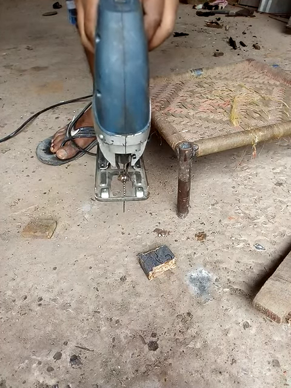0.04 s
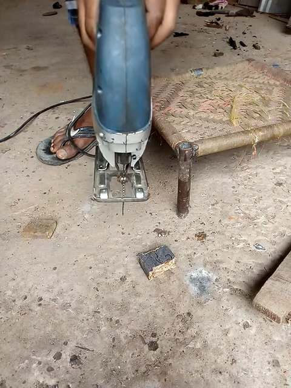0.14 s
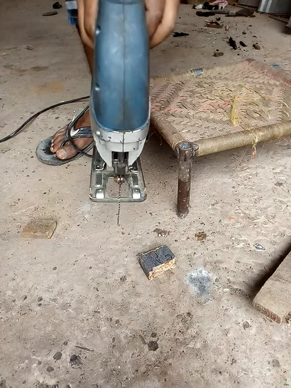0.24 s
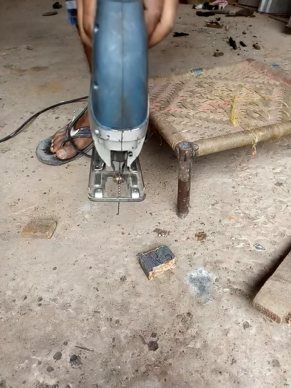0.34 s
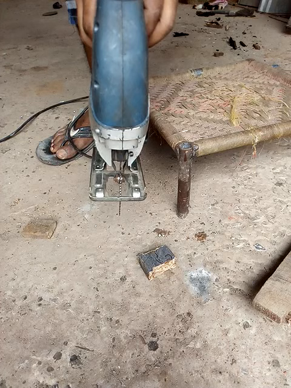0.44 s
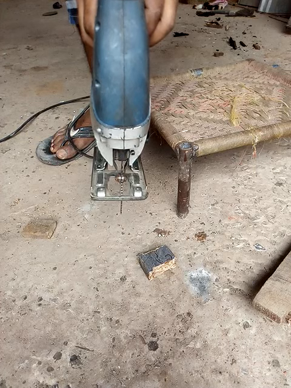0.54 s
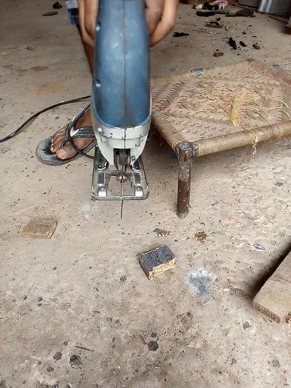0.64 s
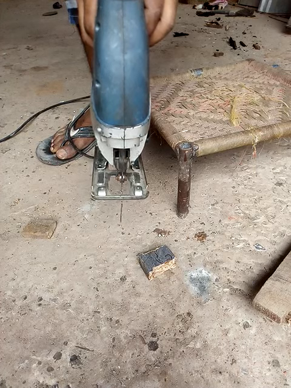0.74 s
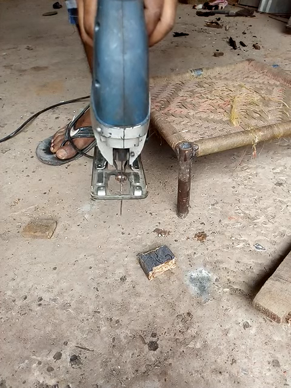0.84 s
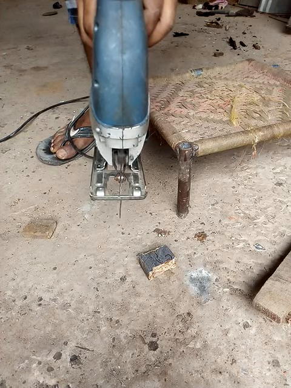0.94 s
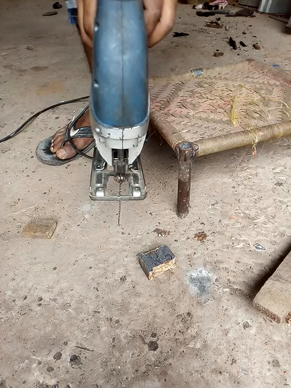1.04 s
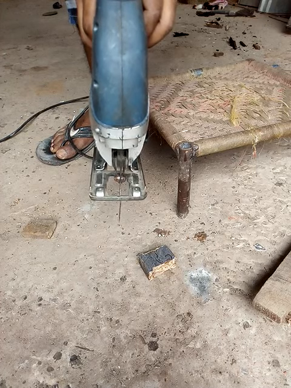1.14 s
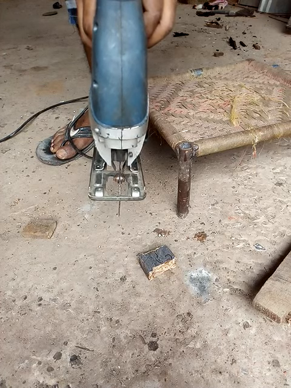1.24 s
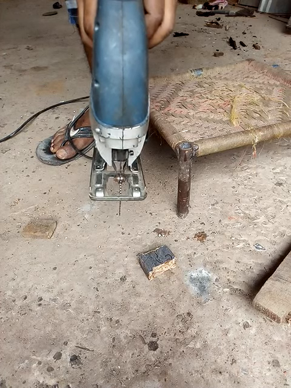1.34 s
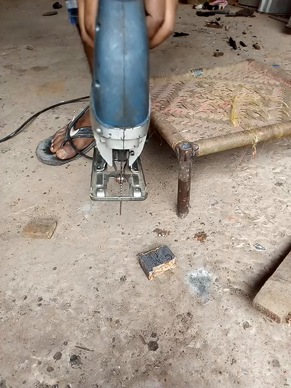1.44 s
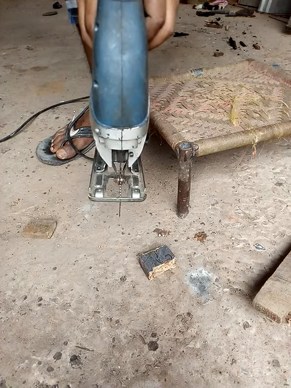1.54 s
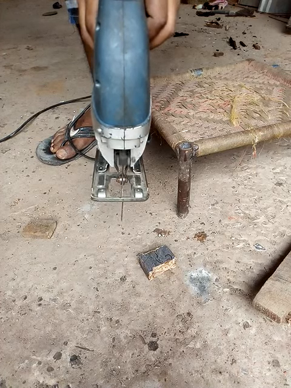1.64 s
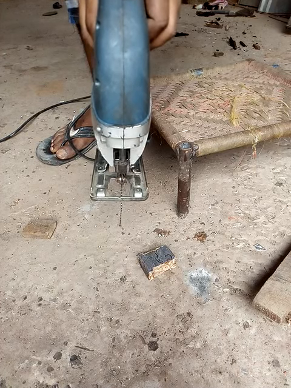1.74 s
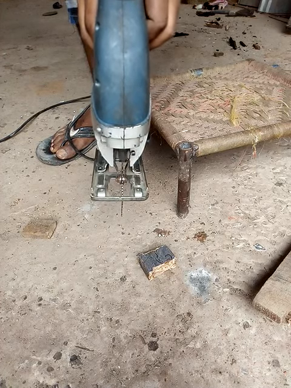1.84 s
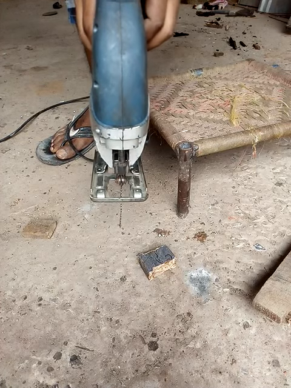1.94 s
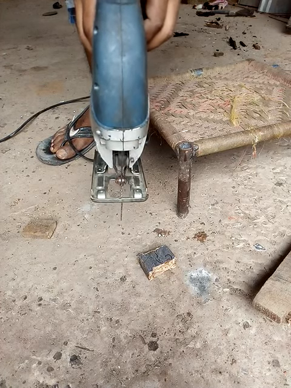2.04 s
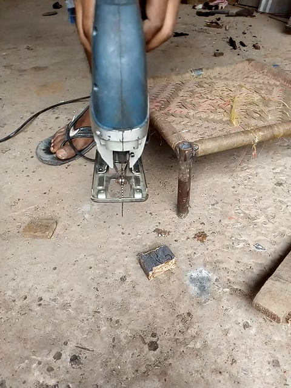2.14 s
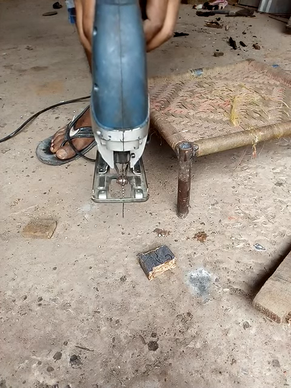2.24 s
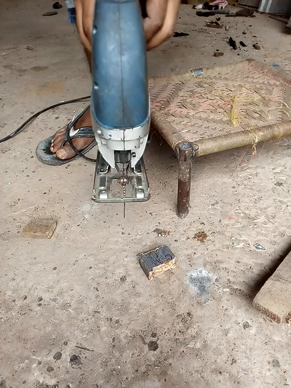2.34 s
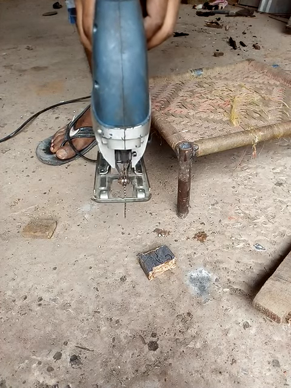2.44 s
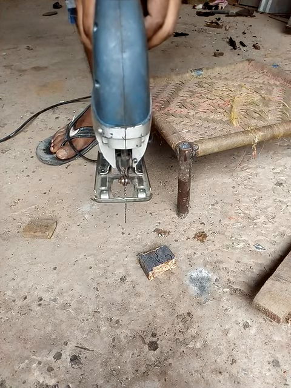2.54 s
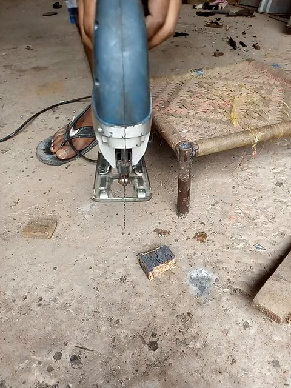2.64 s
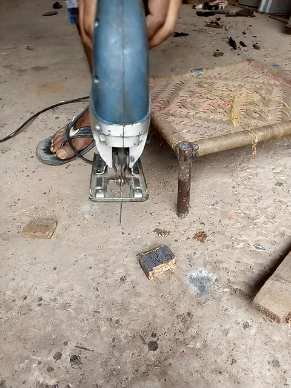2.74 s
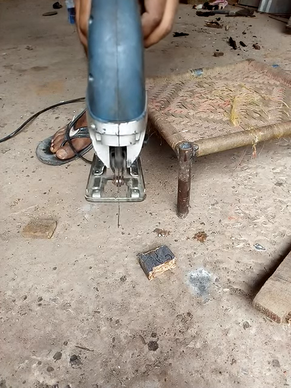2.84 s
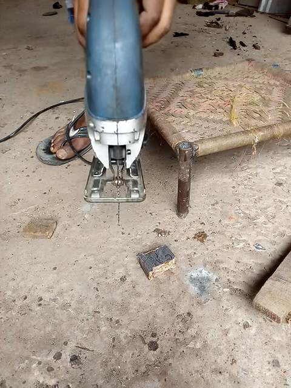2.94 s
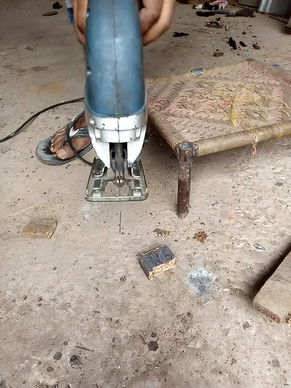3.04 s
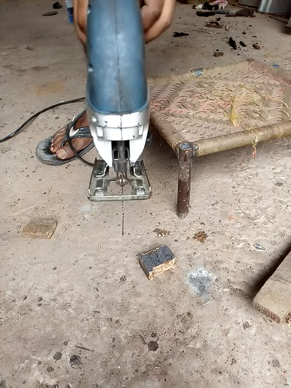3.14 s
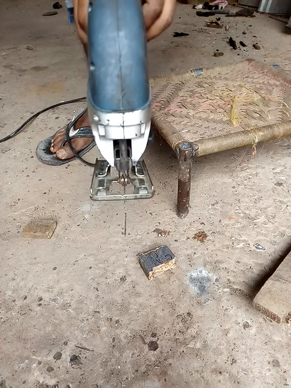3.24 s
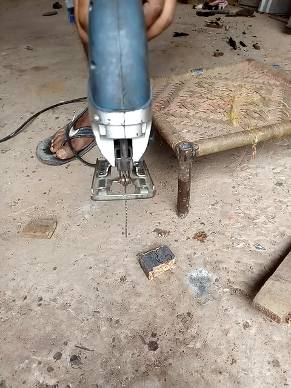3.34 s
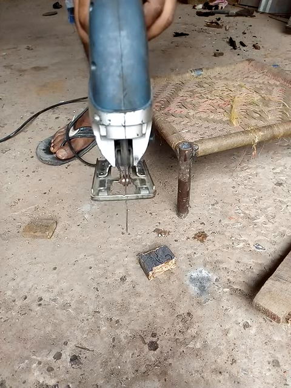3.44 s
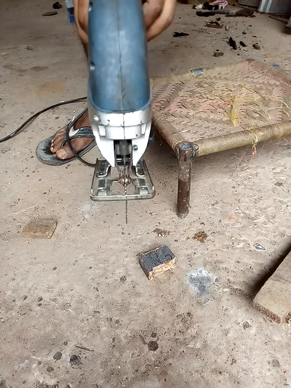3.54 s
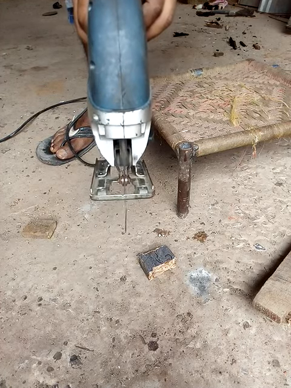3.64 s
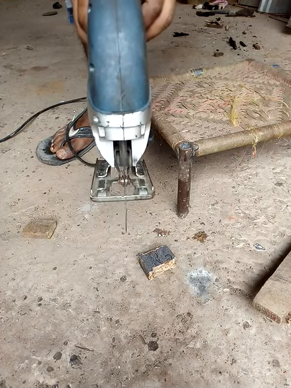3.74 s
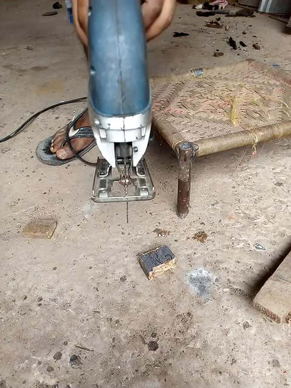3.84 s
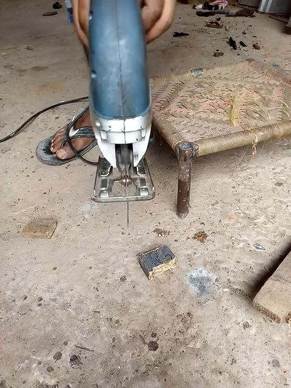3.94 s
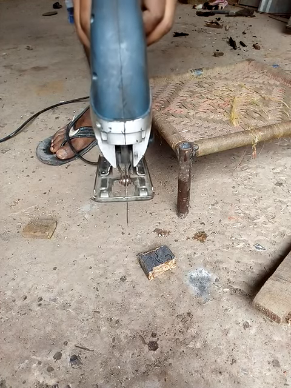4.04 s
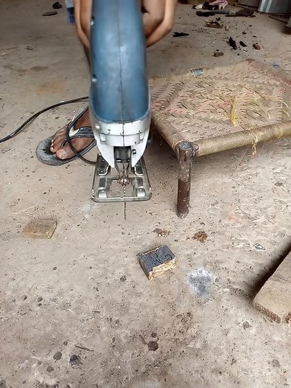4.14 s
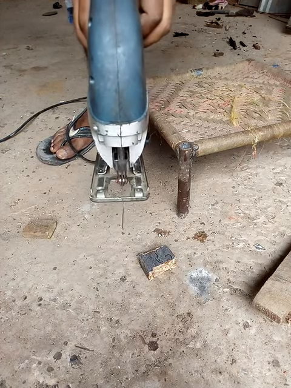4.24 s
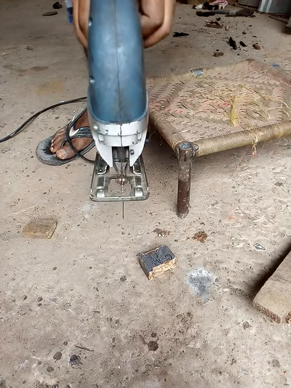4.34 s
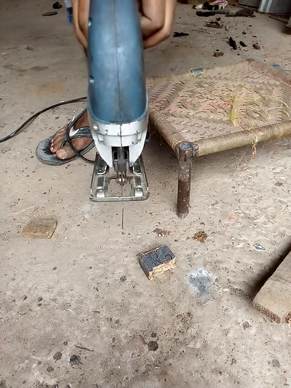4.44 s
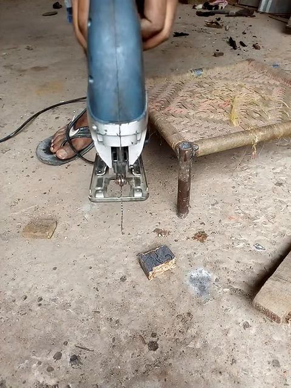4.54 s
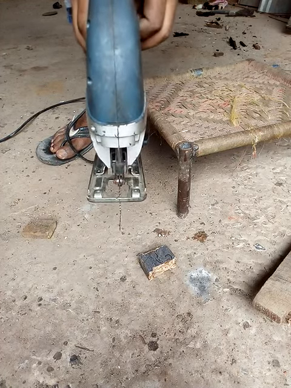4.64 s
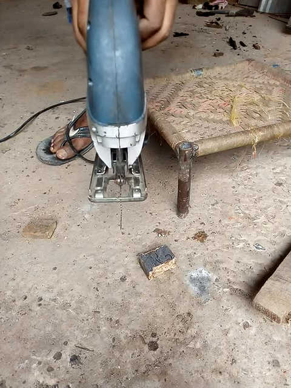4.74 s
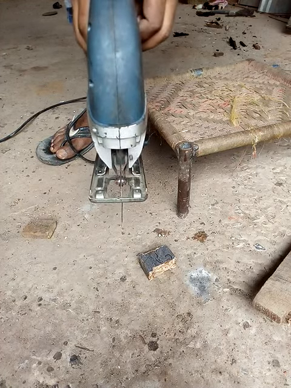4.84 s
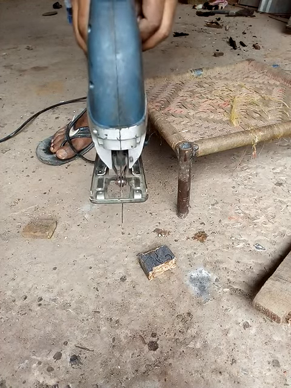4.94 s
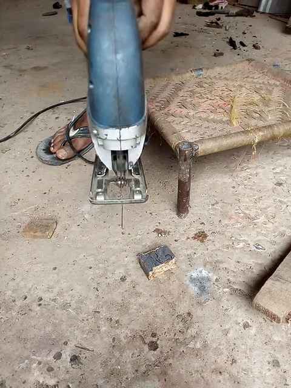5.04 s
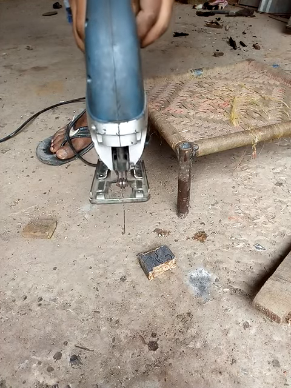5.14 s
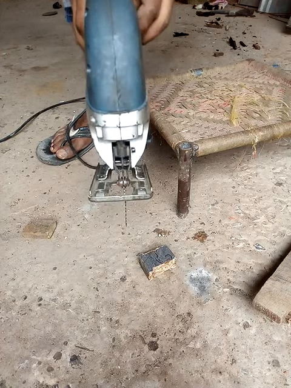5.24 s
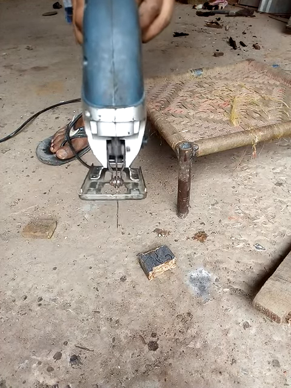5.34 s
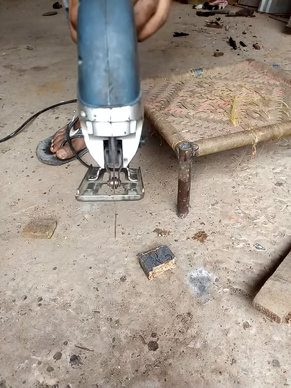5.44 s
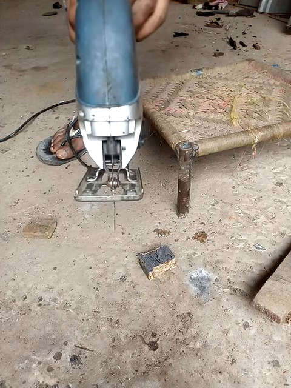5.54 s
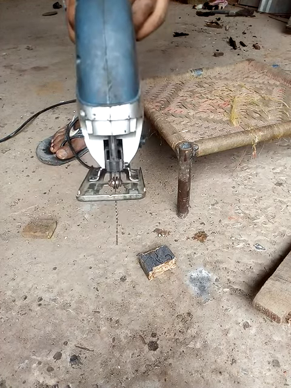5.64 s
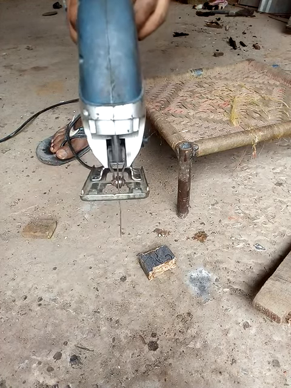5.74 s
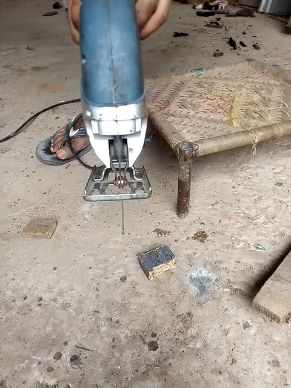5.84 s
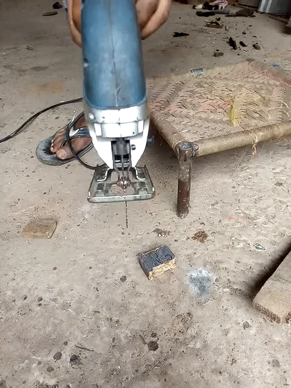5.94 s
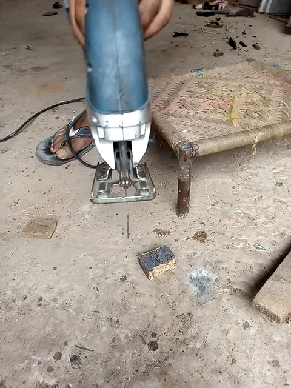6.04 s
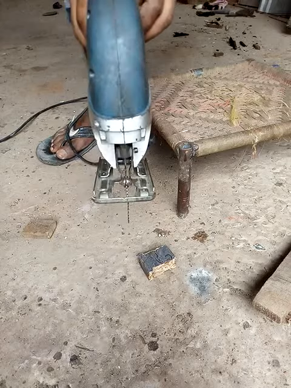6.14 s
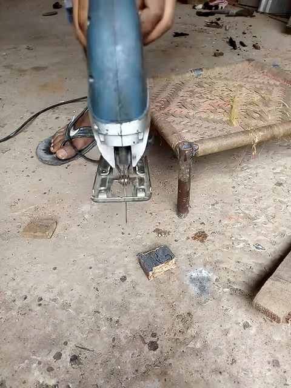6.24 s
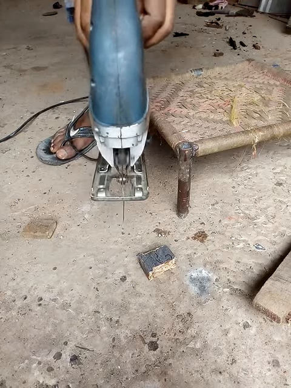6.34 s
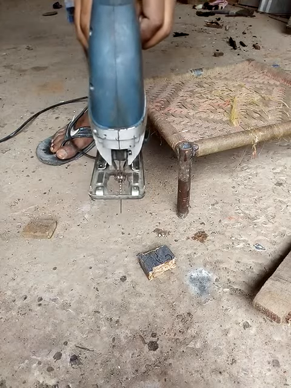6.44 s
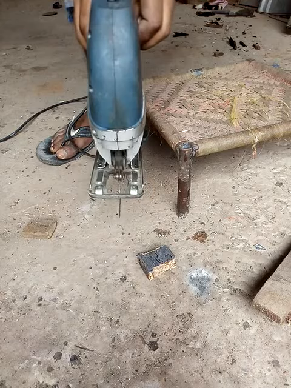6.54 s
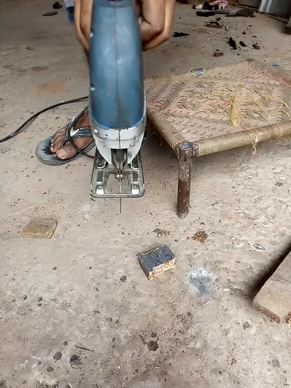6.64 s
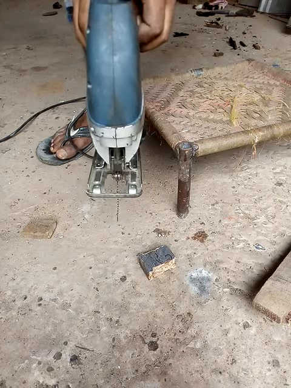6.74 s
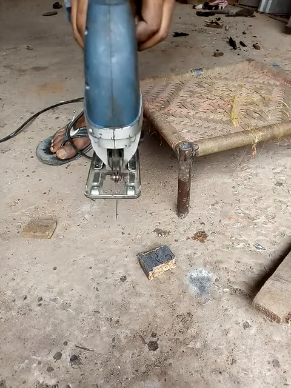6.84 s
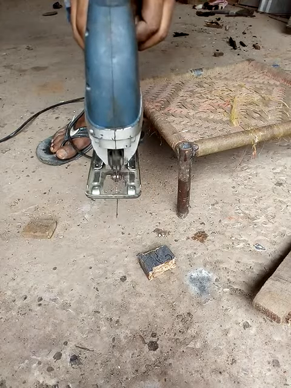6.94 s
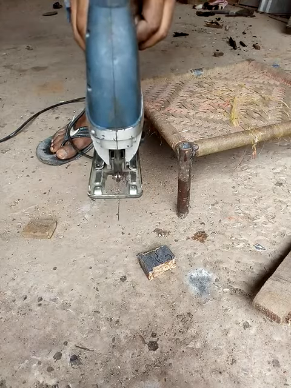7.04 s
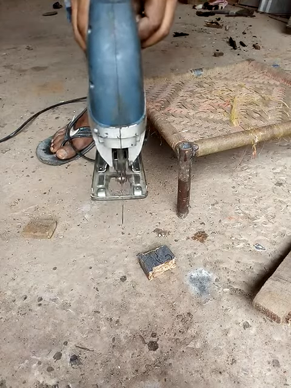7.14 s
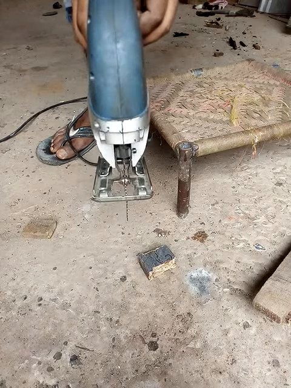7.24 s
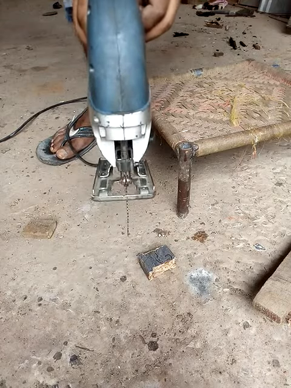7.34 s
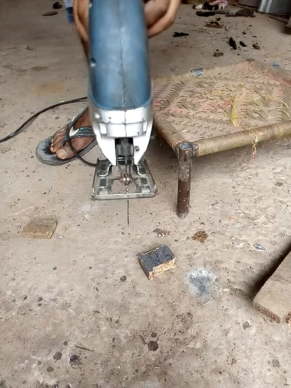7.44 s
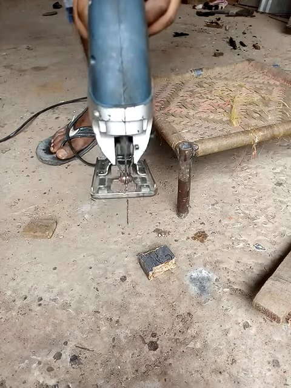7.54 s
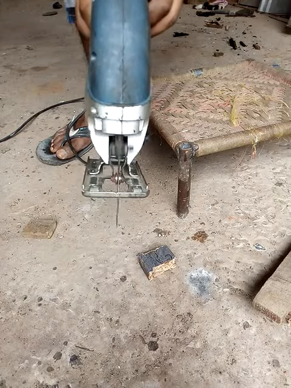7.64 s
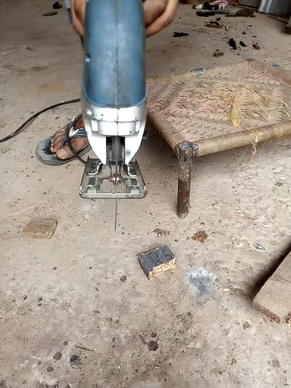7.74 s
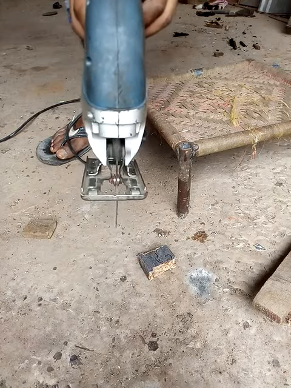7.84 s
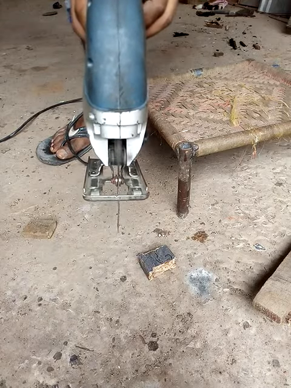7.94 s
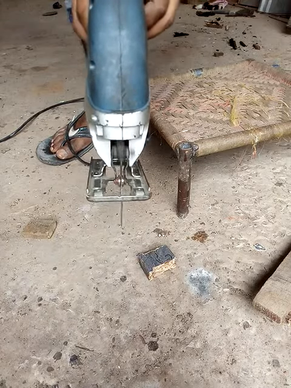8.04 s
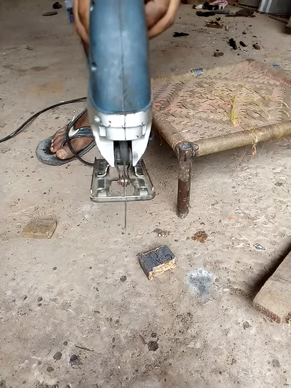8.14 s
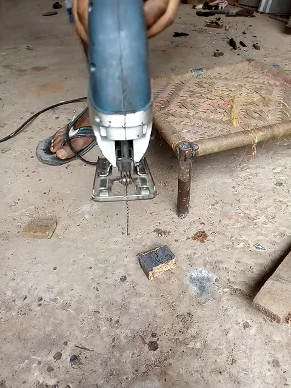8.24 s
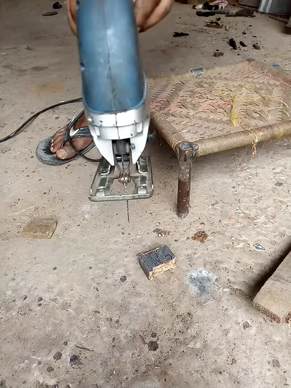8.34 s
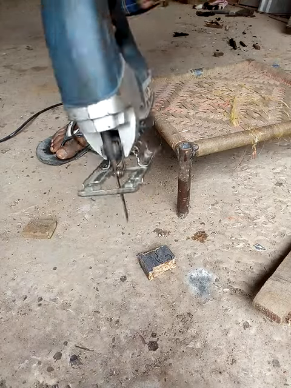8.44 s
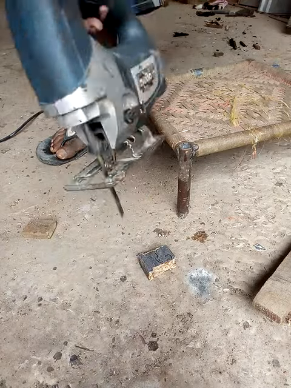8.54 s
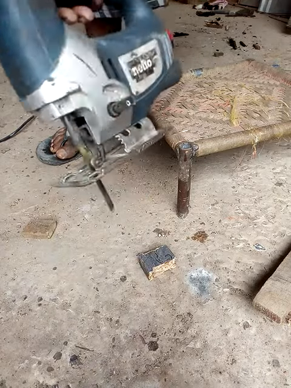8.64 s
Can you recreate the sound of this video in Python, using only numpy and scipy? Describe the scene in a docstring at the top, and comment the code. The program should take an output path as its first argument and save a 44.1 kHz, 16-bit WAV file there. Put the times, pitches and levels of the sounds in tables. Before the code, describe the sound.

Close to the microphone, an electric jigsaw held above a hard floor clicks on and runs in the air. A slow, clattering first run is followed by three faster, louder surges of buzzing motor and gears. After each one the saw winds down and the blade's strokes rattle more slowly, with occasional sharp ticks. At top speed its cooling air hisses and puffs softly against the microphone. The background is quiet.

```python
"""A faint hum and a thin squeal come first, then a trigger clicks and an electric jigsaw revs up.
It runs free above a hard floor, driven by four pulls of the trigger and coasting in between.
The blade rod clacks at both ends of each stroke and the gears grind; both excite the resonances of one
housing. At speed the rotor whines and cooling air hisses from the vents and buffets the microphone."""
import sys
import numpy as np
from scipy import signal
from scipy.fft import rfft, irfft, next_fast_len
from scipy.io import wavfile
from scipy.ndimage import uniform_filter1d, map_coordinates

SR = 44100
rng = np.random.default_rng(int(sys.argv[2]) if len(sys.argv) > 2 else 0)


def dump_mix(stems):
    """Bounce the given channels to the path in sys.argv[1] as a 16-bit WAV at rate SR."""
    frames = np.atleast_2d(stems).T  # one column per channel
    limited = np.clip(frames, -1, 1)  # hard clip at full scale
    pcm = np.round(limited * 32767).astype(np.int16)
    wavfile.write(sys.argv[1], SR, pcm)


N = 383669
TIME = np.arange(N) / SR
REFERENCE_HZ = 400  # rotor speed to which the power laws refer

# squeal of the barely turning motor: t/s, f/Hz, level/dB
START_SQUEAL = [(0, 2760, -62.5), (.1, 2700, -79), (.16, 2570, -65), (.22, 2490, -53.5), (.3, 2570, -66.5)]
# partials of the starting hum: f/Hz, level/dB
START_HUM = [(134, -68), (350, -58)]
# spectral density of the room's background: f/Hz, level/dB
ROOM_SPECTRUM = [(20, -36), (50, -18), (85, -7.5), (130, -6.5), (200, -16), (350, -13), (560, -26),
                 (800, -19), (1140, -34), (2600, -31), (6500, -38), (8500, -50), (13800, -49), (15000, -41)]
# resonances of the housing: f/Hz, bandwidth/Hz, level/dB above the trend
HOUSING_MODES = [(313.3, 54, 22.5), (353.5, 9.2, 33), (382, 5.4, 26), (722, 22, 25), (780, 23, 31),
                 (834.8, 25.6, 35.5), (1224, 54, 20), (1381, 55.6, 31), (1997, 91, 16.5), (2454, 84, 10),
                 (2688, 170, 8), (2806, 22, 15.5), (3013, 150, 8.5), (3140, 24, 6), (4125, 320, 14.5),
                 (4566, 41, 17), (4700, 68, 18), (4933, 89, 19.5), (5225, 99, 21.5), (6130, 114, 12),
                 (6544, 55, 8.5), (6980, 79, 4.5), (7700, 93, 9.5), (8650, 50, -8), (12382, 166, 0)]
# broad trend of the housing's response: f/Hz, level/dB
HOUSING_TREND = [(40, -55), (190.0, -35.5), (520.0, -34.5), (1050.0, -35), (1780.0, -30.5), (2300.0, -19.5),
                 (3600.0, -26), (4800.0, -34.5), (5050.0, -46), (5700.0, -32), (6700.0, -31),
                 (8100.0, -46.5), (10000.0, -51), (13900.0, -53), (14700.0, -50)]
# spectra of the four forces on the housing: f/Hz, level/dB
SWITCH_SPECTRUM = [(300, -21), (1400, -4), (2300, 0), (4200, 5), (6000, -5), (9000, -6)]
CLACK_SPECTRUM = [(100, 6), (350, -3), (830, -4.5), (1400, 1.5), (2500, 0.5), (4500, 2.5), (7000, 0),
                  (15000, 1.5)]
GRIND_SPECTRUM = [(100, -2.5), (350, 4), (560, -0.7), (830, 2.9), (1400, -0.3), (2500, -0.57), (4500, -2),
                  (7000, 0.6), (15000, -2.3)]
SNAP_SPECTRUM = [(300, -40), (1400, 1), (2300, 12), (4200, -1), (6000, 8), (9000, -8)]
# trigger pulls: pressed t/s, released t/s, limiting rotor f/Hz, spin-up time constant/s
TRIGGER_PULLS = [(.272, 1.603, 226.5, .73), (2.747, 3.875, 387, .529), (5.356, 5.96, 447.5, .303),
                 (7.66, 8.132, 453, .19)]
# blows as the linkage takes up its slack: t/s, level/dB
SLACK_BLOWS = [(.374, -36.5), (.435, -25), (.612, -35), (.699, -36), (.78, -26), (1.375, -25), (1.606, -21),
               (1.96, -23), (1.988, -24), (2.029, -25), (2.302, -35), (2.803, -27), (4.538, -27),
               (4.782, -24), (6.971, -19), (7.678, -18.5), (8.092, -23)]
# gain of the housing's strongest resonance: t/s, level/dB
RESONANCE_GAIN = [(.58, 2), (.8, 0.2), (3.5, -0.6), (4.9, 0.4), (6.9, -.5), (8.0, 2)]
# spectra of the cooling air's hiss and rumble: f/Hz, level/dB
VENT_SPECTRUM = [(500, -12), (3000, -6), (7500, 9), (9500, -0.5), (13900, -6), (14700, 4), (16000, 2)]
WIND_SPECTRUM = [(15, -30), (30, -10), (50, -4), (90, -1.5), (150, -2), (260, -22), (600, -14),
                 (2000, -70)]
# puffs of cooling air on the microphone: t/s, duration/s, level/dB
AIR_PUFFS = [(3.43, 0.15, -41), (3.93, 0.072, -35), (5.72, 0.13, -41), (6.05, 0.091, -32.5),
             (8.29, .1, -38)]
# gain of the saw as the hand sways it and at last swings it round: t/s, level/dB
HAND_SWAY = [(0.45, -3.5), (.8, -2), (1.45, 0), (2.3, -0.8), (2.7, -0.5), (4.2, 0.5), (5.4, 0.1),
             (6.3, 0.8), (7.6, -0.2), (8.4, 0.36), (8.7, 3)]


def amp(db):
    """Amplitude ratio: tenfold for every 20 dB."""
    return 10 ** (np.asarray(db) / 20)


def unit(x):
    """Normalisation to an rms of 1."""
    return x / np.sqrt(np.mean(x ** 2) + 1e-20)


def curve(rows, column=1):
    """Linear interpolation of a table in time."""
    rows = np.asarray(rows, float)
    return np.interp(TIME, rows[:, 0], rows[:, column])


def spectrum(points, hz):
    """Interpolation of levels on a log-frequency axis."""
    f, db = np.transpose(points)
    return np.interp(np.log(hz + 1), np.log(f + 1), db)


def drift(per_s):
    """Smooth random modulation of rms 1, changing about per_s times a second."""
    return unit(map_coordinates(rng.standard_normal(N // 10), [TIME * per_s], order=2, mode="wrap"))


def start_up(fade_s=0.45):
    """Phase-modulated tones: the motor hums and squeals until it gets going."""
    phase = 2 * np.pi * np.cumsum(curve(START_SQUEAL)) / SR + 0.63 * drift(per_s=116)
    squeal = amp(curve(START_SQUEAL, column=2)) * np.sin(phase)
    hum = sum(amp(db) * np.sin(2 * np.pi * hz * TIME + .5 * drift(per_s=24)) for hz, db in START_HUM)
    return (squeal + hum) * np.clip(2 * (1 - TIME / fade_s), 0, 1)


def noise(points):
    """Spectral shaping of white noise gives a steady rush of rms 1."""
    size = next_fast_len(N)
    gain = amp(spectrum(points, np.fft.rfftfreq(size, 1 / SR)))
    return unit(irfft(rfft(rng.standard_normal(size)) * gain, size)[:N])


def room(x, wet_db=-15.0, t60_s=0.12, size=16000):
    """Reverberation: sparse reflections from floor and walls decay exponentially."""
    t = TIME[:size]
    reflections = rng.choice([-1, 1], size) * (rng.random(size) < 2000 / SR) * (t > .003)
    tail = reflections * amp(-60 * t / t60_s)
    return x + amp(wet_db) * signal.oaconvolve(x, tail / np.linalg.norm(tail))[:N]


def switch(at_s=.22, decay_s=0.005, level_db=-41):
    """Impact excitation: the trigger's contact snaps shut once and rings the housing."""
    burst = (TIME > at_s) * np.exp(-abs(TIME - at_s) / decay_s)
    return amp(level_db) * housing(burst * rng.standard_normal(N), SWITCH_SPECTRUM)


def housing(force, colour, size=8192):
    """Forced resonance: the force is convolved with the housing's unit-energy impulse response."""
    hz = abs(np.fft.fftfreq(size, 1 / SR))
    peaks = sum(amp(db) ** 2 / (1 + (2 * (hz - f) / width) ** 2) for f, width, db in HOUSING_MODES)
    gain = amp(spectrum(HOUSING_TREND, hz) + spectrum(colour, hz)) * np.sqrt(1 + peaks)
    minimum_phase = np.exp(np.conj(signal.hilbert(np.log(gain))))
    ring = np.fft.ifft(minimum_phase).real[:size // 2]
    return signal.oaconvolve(force, ring / np.linalg.norm(ring))[:N]


def motor_speed(creep_hz=10.0, friction_hz_per_s=107.4, drag_hz=340, smooth_s=.07):
    """Energy balance sets the turns per second: pulls feed the rotor, friction and fan drag brake it."""
    speed = np.full(N, creep_hz)
    for pressed, released, top_hz, spin_up_s in TRIGGER_PULLS:
        start = round(pressed * SR)
        t = TIME[start:]
        held_s = np.minimum(t, released) - pressed
        energy_deficit = (top_hz ** 2 - speed[start] ** 2) * np.exp(-held_s / spin_up_s)
        driven = np.sqrt(top_hz ** 2 - energy_deficit)
        # quadratic drag equals the constant friction at drag_hz
        braking = friction_hz_per_s * np.maximum(t - released, 0) / drag_hz
        speed[start:] = drag_hz * np.tan(np.maximum(np.arctan(driven / drag_hz) - braking, 0))
    return uniform_filter1d(np.maximum(speed, 1), size=round(smooth_s * SR))


def coasting(speed):
    """Sign of the acceleration, smoothed: 1 while the motor slows, otherwise 0."""
    return uniform_filter1d(1. * (np.gradient(speed) < 0), size=6000)


def chatter(per_s, spread_db):
    """Shot noise: tiny metal contacts of uneven size at random instants."""
    size = amp(spread_db * np.minimum(rng.exponential(1, N), 4))
    return unit(size * rng.choice([-1, 1], N) * (rng.random(N) < per_s / SR))


def rod(strokes, lead=0.097, slap_lag=0.242, rise_s=0.0013, decay_s=0.013, uneven_db=2.1):
    """Backlash: the rod crosses its play and strikes at each reversal, then slaps its guide midway."""
    blows = np.zeros(N)
    for offset, db in [(0, 0), (.5, 1), (slap_lag, -12), (.5 + slap_lag, -12)]:  # offsets in cycles
        at = np.flatnonzero(np.diff(np.floor(strokes + lead - offset)) > 0)
        blows[at] += amp(db + uneven_db * rng.standard_normal(N // 100)[:len(at)])
    t = TIME[:SR // 10]
    burst = signal.oaconvolve(blows, (1 - np.exp(-t / rise_s)) * np.exp(-t / decay_s))[:N]
    burst /= np.sqrt(abs(uniform_filter1d(burst ** 2, size=13000)) + 1e-3)  # even power at any rate
    return housing(burst * chatter(per_s=9000, spread_db=1.0), CLACK_SPECTRUM)


def gears(turns, throb=0.25, waver_db=0.93):
    """Amplitude modulation: teeth and bearings grind harder once in every turn of the rotor."""
    pressure = (1 + throb * np.cos(2 * np.pi * turns)) * amp(waver_db * drift(per_s=110))
    return housing(unit(pressure * chatter(per_s=6000, spread_db=2.0)), GRIND_SPECTRUM)


def shake_db(speed, db_per_octave=6.5, rattle_hz=306, rattle_span_hz=19, slow_hz=131.0):
    """Vibration level follows a power law of speed; past a threshold the linkage rattles louder."""
    running = -21 + db_per_octave * np.log2(speed / REFERENCE_HZ) - 0.58 * coasting(speed)
    rattle = 2.5 / (1 + np.exp((rattle_hz - speed) / rattle_span_hz))
    build_up = 22.5 * np.minimum(TIME - 0.57, 0)  # the shaking grows from rest
    wander = .5 * np.minimum(slow_hz / speed, 2) * drift(per_s=18)  # less even when slow
    return running + rattle + build_up + wander


def mechanism(speed, turns, gear_ratio=10.6, crossover_hz=189.0, gentle_hz=126.0):
    """Incoherent sources add in power: clacks rule at middling speed, grinding at high speed."""
    firmness = speed ** 2 / (speed ** 2 + gentle_hz ** 2)  # a crawling rod reverses softly
    clack_share = firmness / (1 + (speed / crossover_hz) ** 2)
    clacks = np.sqrt(clack_share) * rod(turns / gear_ratio)
    grinding = np.sqrt(1 - clack_share) * gears(turns)
    return amp(shake_db(speed)) * (clacks + grinding)


def resonance_swell(x, centre_hz=840.0, width_hz=150.0):
    """Band-pass gain: the housing's strongest resonance slowly swells and sinks against the rest."""
    band = signal.lfilter(*signal.iirpeak(centre_hz, centre_hz / width_hz, fs=SR), x)
    return x + (amp(curve(RESONANCE_GAIN)) - 1) * band


def snaps(rise_s=0.00066, decay_s=0.0025):
    """Brief impacts have broad spectra: the linkage takes up its slack with bright blows."""
    burst = sum(amp(db) * np.clip((TIME - s) / rise_s, 0, 1) * np.exp(-abs(TIME - s) / decay_s)
                for s, db in SLACK_BLOWS)
    return housing(burst * rng.standard_normal(N), SNAP_SPECTRUM)


def whine(speed, turns, order=36, blur_rad=.95, flicker_db=3.0):
    """A high harmonic of the rotation, blurred and flickering, weaker while the motor coasts."""
    phase = 2 * np.pi * order * turns + blur_rad * drift(per_s=410)
    level_db = -58 - coasting(speed) + flicker_db * drift(per_s=35)
    return amp(level_db) * (speed / REFERENCE_HZ) ** 1.5 * np.sin(phase)


def rotor_hum(speed, turns, level_db=-38.0):
    """Rotating imbalance forces a vibration at the rotation frequency."""
    phase = 2 * np.pi * turns + .4 * drift(per_s=30)
    return amp(level_db) * (speed / REFERENCE_HZ) ** 3 * np.sin(phase)


def gear_tone(speed, turns, order=2.46, plate_hz=503.0, width_hz=89.0):
    """Swept resonance: the loaded gears sing as their tone passes a mode of the sole plate."""
    mesh_hz = order * speed
    resonance = 1 / np.hypot(1, 2 * (mesh_hz - plate_hz) / width_hz)
    low_cut = np.minimum(mesh_hz / plate_hz, 1) ** 2
    phase = 2 * np.pi * order * turns + 0.59 * drift(per_s=30)
    return amp(-47 - 3 * coasting(speed)) * resonance * low_cut * np.sin(phase)


def vents(speed, level_db=-47.5):
    """Flow noise: air leaving the vents hisses by a power law of speed."""
    return amp(level_db) * (speed / REFERENCE_HZ) ** 2.2 * noise(VENT_SPECTRUM)


def draught(speed, level_db=-41.0, lag_s=0.12, lumpy_db=2.0):
    """Turbulent pressure: the fan's wind rumbles in puffs, lags the rotor and grows steeply with it."""
    pole = np.exp(-1 / (lag_s * SR))
    flow = signal.lfilter([1 - pole], [1, -pole], speed) / REFERENCE_HZ
    steady = amp(level_db + lumpy_db * drift(per_s=25)) * flow ** 4
    puffs = sum(amp(db) * np.exp(-(2 * (TIME - s) / length) ** 2) for s, length, db in AIR_PUFFS)
    return np.hypot(steady, puffs) * noise(WIND_SPECTRUM)


def scene():
    """Superposition of saw, wind and background; one rotor speed drives the running parts."""
    speed = motor_speed()
    turns = np.cumsum(speed) / SR
    saw = resonance_swell(mechanism(speed, turns)) + snaps() + switch()
    saw += whine(speed, turns) + rotor_hum(speed, turns) + gear_tone(speed, turns)
    saw += vents(speed) + start_up()
    saw *= amp(curve(HAND_SWAY))
    return (room(saw) + draught(speed) + amp(-57.5) * noise(ROOM_SPECTRUM))[None]


def record(dry, cutoff_hz=15550):
    """Band limiting: a steep low-pass filter removes the highest treble."""
    low_pass = signal.firwin(801, cutoff_hz, window=("kaiser", 9), fs=SR)
    return signal.oaconvolve(dry, low_pass[None], "same")


dry = scene()
out = record(dry)
dump_mix(out)
```